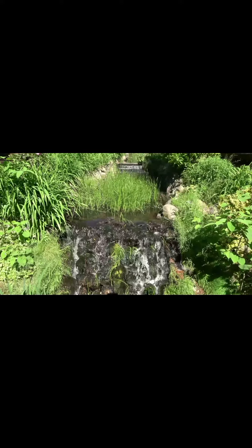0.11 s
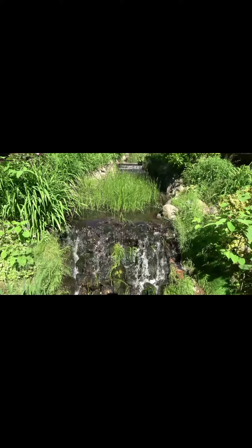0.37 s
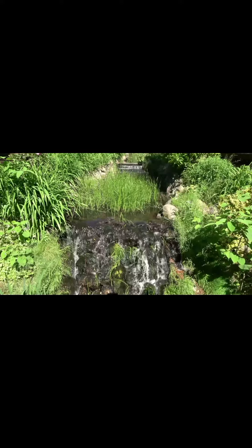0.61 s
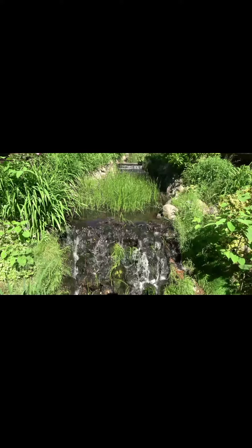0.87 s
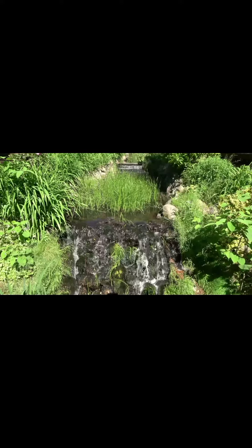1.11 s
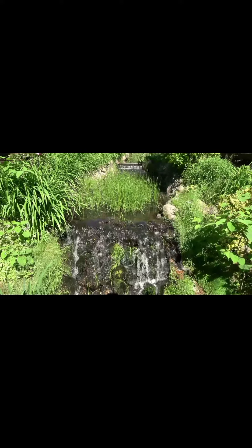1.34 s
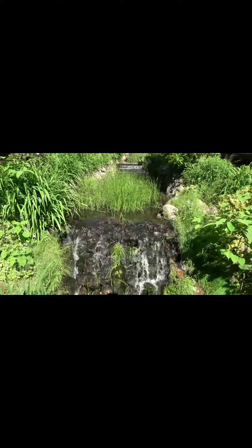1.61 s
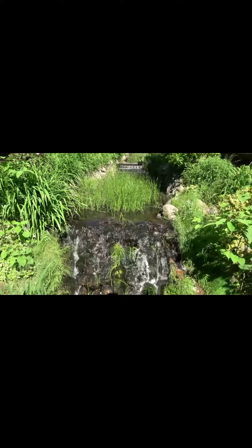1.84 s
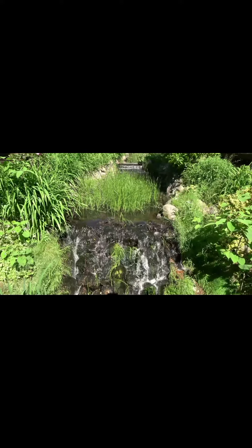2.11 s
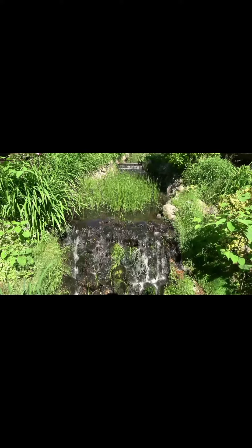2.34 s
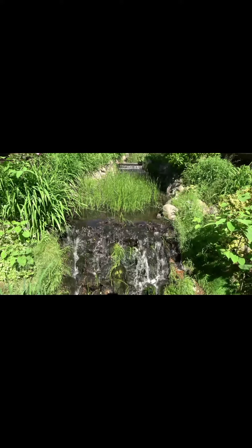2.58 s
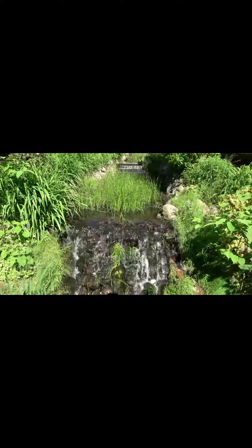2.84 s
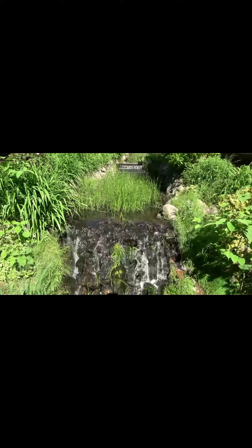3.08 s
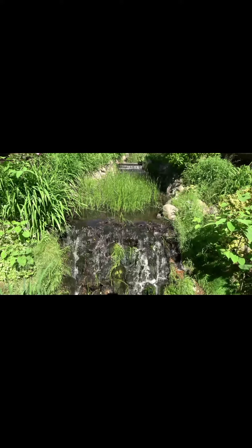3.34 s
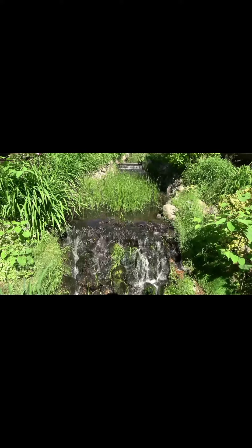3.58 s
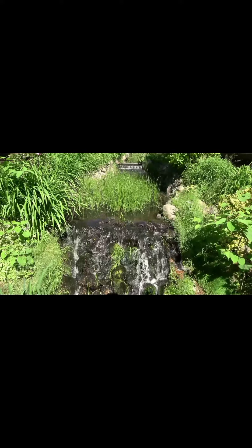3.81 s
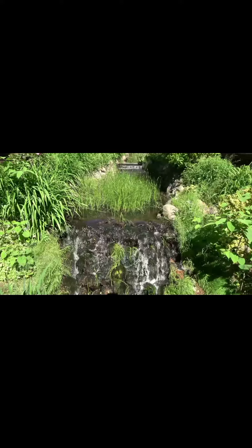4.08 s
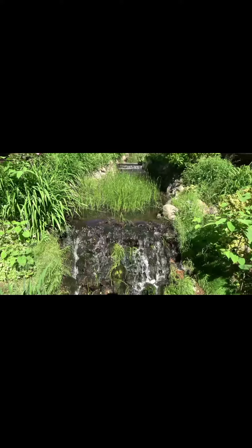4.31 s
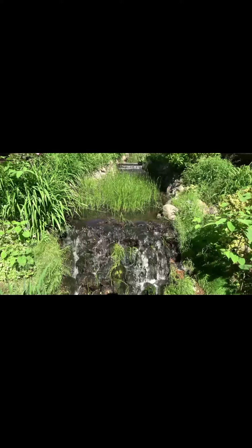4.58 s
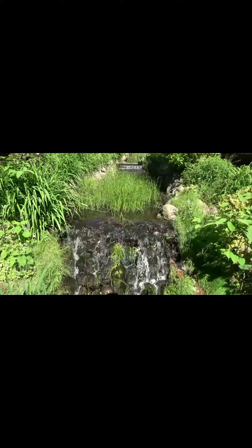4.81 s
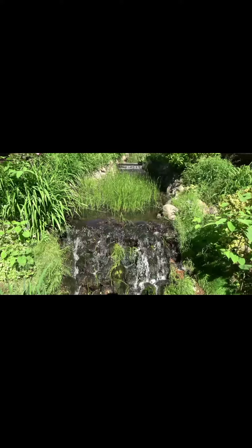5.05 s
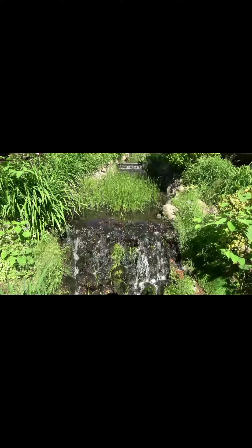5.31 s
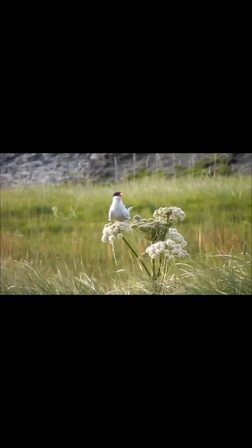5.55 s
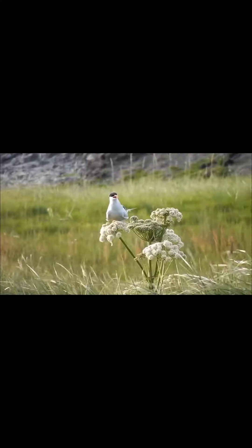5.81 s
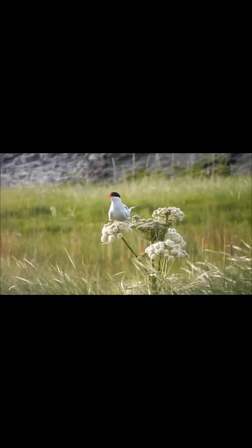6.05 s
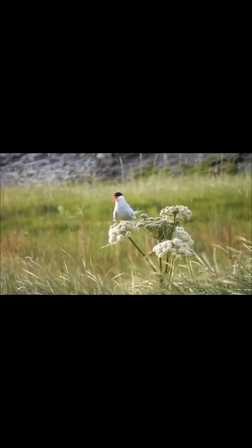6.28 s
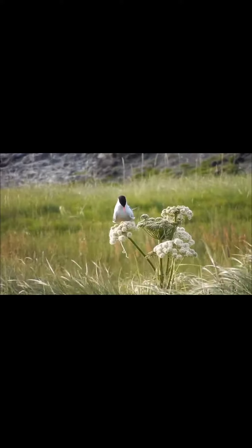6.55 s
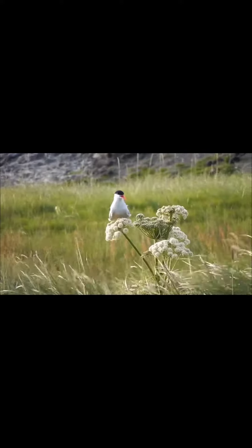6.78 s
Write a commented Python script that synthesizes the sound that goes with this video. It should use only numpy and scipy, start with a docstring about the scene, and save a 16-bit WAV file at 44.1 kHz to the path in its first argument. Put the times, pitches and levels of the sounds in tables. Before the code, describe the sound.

From 0 to 4.85 seconds a small waterfall splashes without pause, a broad watery hiss with bubbling gurgles, fine spray and faint low rumble. A clear whistle near 2 kHz sounds on the left at the start; from 0.9 to 2.1 a distant bird repeats short even pips, with a fuller answering note on the right around 1.7 and scattered blurred chips. Birdsong thins until about 3.5, then thickens: another piped note, soft dove-like coos, and a near bird's bright whistles from 3.7, bending downward, ending in two steep falls near 4.6 and 4.8, echoing in the hollow. Everything stops abruptly. After about 0.7 seconds of silence, at 5.57 a much quieter shore cuts in: soft low distant surf, with terns giving buzzing, rapidly chopped churrs, some closing on a clean falling note, around 5.6, 5.8, 6.25 and 6.8, between quick high yelps and hoarse grunts until 7.

```python
"""Waterfall hollow, then tern shore

A small waterfall of shaped noise and ringing droplets splashes over rocks in a leafy hollow, while
songbirds built from gliding sines and smeared tones whistle, sweep and chip around it.
The sound cuts to silence, then to a shore meadow: terns of stacked partials and chopped rasp churr
and yelp over a low noise wash of far surf, their lower partials coming back late on the right."""
import sys
import numpy as np
from scipy import signal
from scipy.fft import rfft, irfft, next_fast_len
from scipy.io import wavfile
from scipy.ndimage import uniform_filter1d

SR = 44100
rng = np.random.default_rng(int(sys.argv[2]) if len(sys.argv) > 2 else 0)


def invert_db(x):
    """Field ratio 10**(x/20) for x, a level in decibels (scalar or array-like)."""
    u = np.asarray(x, float) / 20
    return 10 ** u


def generate_wav(sig):
    """Save sig (samples, or channels by samples) to the path in sys.argv[1] as 16-bit PCM at SR."""
    pcm = np.round(np.clip(np.atleast_2d(sig).T, -1, 1) * 32767).astype(np.int16)
    wavfile.write(sys.argv[1], SR, pcm)


N = 304731  # length in samples


def evened(x):
    """Scales a sound to an rms of 1."""
    return x / np.sqrt(np.mean(x ** 2) + 1e-20)


def read(points, hz, axis=1):
    """Reads one column of a table over log frequency."""
    columns = np.transpose(points)
    return np.interp(np.log(hz + 1), np.log(columns[0] + 1), columns[axis])


def add(mix, s, sound):
    """Lays a sound into the mix, in place, at time s."""
    part = mix[..., round(s * SR):][..., :sound.shape[-1]]
    part += sound[..., :part.shape[-1]]


def unroll(rows):
    """Turns breakpoints into a start time and one envelope per column, sample by sample."""
    s, *columns = np.transpose(rows)
    t = np.arange(s[0], s[-1], 1 / SR)
    return s[0], [np.interp(t, s, column) for column in columns]


def coloured(x, gain_db):
    """Filters by a gain given as a function of frequency."""
    size = next_fast_len(x.shape[-1])
    gain = invert_db(gain_db(np.fft.rfftfreq(size, 1 / SR)))
    return irfft(rfft(x, size) * gain, size)[..., :x.shape[-1]]


def sided(x, pan_db):
    """Places a sound between left and right by a level difference; positive is left."""
    return x * invert_db(np.array([pan_db / 2, -pan_db / 2]).reshape(2, -1))


# Tone colour of the falling water: f/Hz, relative level/dB per Hz
FALL = [(15, -40.5), (25, -9.5), (64, -1), (247, -10), (351, -9), (424, -7.5), (472, -8), (586, -14),
        (670, -10.5), (1720, -6), (3200, -11.5), (5200, -9), (6280, -12.5), (9410, -13), (15700, -21.5)]
# Stereo width of the fall: f/Hz, left-right likeness (-1 to 1)
FALL_SAME = [(30, -.3), (60, .1), (150, .3), (380, .8), (950, .92), (2380, .83), (5000, .5), (7000, .62),
             (8500, .72), (10500, .66), (12500, .4), (15000, .3)]
# Slow swell of the whole fall except its rumble: t/s, level/dB
FALL_SWELL = [(0, 2), (1, 1), (2, 1.5), (3, 1), (4, 2), (4.85, 2.5)]


def waterfall():
    """Dense falling water is a noise wash, with bubbling gurgles and fine spray standing a little out."""
    balance = [(60, 1.5), (500, 1.2), (15000, .1)]  # f/Hz, left-right level/dB
    body = wash(FALL, FALL_SAME, balance, patchy_db=1.77, flicker_db=2.0)
    gurgle = droplets(500, low_hz=509.7, high_hz=2800, cycles=3.8, spread_db=1.5)
    spray = droplets(980, low_hz=3500, high_hz=12000, cycles=2.5, spread_db=5.5)
    swell = invert_db(np.interp(np.arange(N) / SR, *np.transpose(FALL_SWELL)))
    water = invert_db(0.28) * body + invert_db(-13) * gurgle + invert_db(-21) * spray
    return invert_db(-43.5) * swell * water + drone(hz=57.3, width_hz=28.6, level_db=-54.5)


def wash(spectrum, same, balance, patchy_db, flicker_db):
    """Many small splashes merge into noise: random spectra with drifting patches and a treble flicker."""
    frames, hz = N // 128 + 5, np.fft.rfftfreq(512, 1 / SR)
    a, b, c, d, patches = rng.standard_normal((frames, 257, 5)).T
    patches = evened(uniform_filter1d(uniform_filter1d(patches, 5, 0), 16, 1))
    # smoothed over 120 bins, so wide bands flicker together
    flicker = evened(uniform_filter1d(rng.standard_normal((frames, 257)).T, 120, 0))
    treble = np.clip(hz / 1500, 0, 1)[:, None]
    like = np.clip(read(same, hz), -1, 1)[:, None]
    left = a + 1j * b
    right = like * left + np.sqrt(1 - like ** 2) * (c + 1j * d)
    z = np.array([left, right]) * invert_db(patchy_db * patches + flicker_db * treble * flicker)
    noise = signal.istft(z, nperseg=512, noverlap=384)[1][:, :N]
    sides = [coloured(noise[k], lambda f: read(spectrum, f) + (.5 - k) * read(balance, f))
             for k in range(2)]
    return evened(np.array(sides))


def droplets(per_s, low_hz, high_hz, cycles, spread_db, count=24):
    """Bubbles ring as short rising tones at chance moments, a few of them large."""
    size = invert_db(spread_db * np.minimum(rng.exponential(1, N), 5))
    hits = size * (rng.random(N) < per_s / SR)
    kind, out = rng.integers(0, count, N), np.zeros((2, N))
    for k, hz in enumerate(np.geomspace(low_hz, high_hz, count)):
        turns = np.arange(0, 3 * cycles, hz / SR)
        tone = np.sin(2 * np.pi * turns * (1 + .03 * turns / cycles))
        ring = tone * np.exp(-1.5 * turns / cycles) * np.minimum(turns, 1)
        pan = invert_db(rng.uniform(0.5, 2.0) * np.array([[1], [-1]]))
        out += signal.oaconvolve(hits * (kind == k), ring)[:N] * pan
    return evened(out)


def drone(hz, width_hz, level_db):
    """Heavy water rumbles low in one narrow noise band, unlike at the two microphones."""
    sides = [chip(0, N / SR, hz, hz, width_hz, level_db, 0, edge=0)[1][0] for _ in range(2)]
    return np.array(sides)


# Reverb time of the hollow: f/Hz, t60/s
HOLLOW = [(500, 0.45), (2000, 1), (4500, 1), (7000, 0.57)]


def songbirds():
    """Near and far singers, all thrown back by the hollow; the loud sweeps stir it most."""
    pipers, sweeper, far = piping_birds(), sweeping_bird(), blurred_birds()
    sent = invert_db(-12) * pipers + invert_db(-3) * sweeper + invert_db(-10) * far
    return pipers + invert_db(-1.5) * sweeper + far + echoes(sent, HOLLOW, start_s=.008, shared=.35)


# Near singer's syllables, held then bent down: t/s, length/s, start f/Hz, end f/Hz, level/dB before trim
HOOKS = [(3.671, 0.072, 5560, 5110, -34.5), (3.907, 0.096, 7260, 5650, -29.5),
         (4.209, .097, 7380, 5800, -28.5), (4.389, 0.088, 7180, 5510, -31.5)]
# Its nearly straight falls, same columns
SLIDES = [(4.628, .072, 5660, 3285, -27.5), (4.78, .068, 5817, 3440, -26.5)]
# Its short dying pips, same columns
PIPS = [(3.806, 0.034, 4570, 4400, -33), (4.045, .045, 5310, 5140, -36), (4.125, 0.047, 4620, 4265, -28.5),
        (4.52, 0.061, 4000, 4043, -33)]
# Syllable shapes: bend exponent, start level/dB, peak place (0-1), end level/dB, left-right level/dB
HOOK_SHAPE = (3.2, -10, .78, -3, -9)
SLIDE_SHAPE = (.92, -10, .35, -7, -5)
PIP_SHAPE = (1.4, -7, .3, -9, -1.5)


def sweeping_bird():
    """The near singer glides a pure whistle through hooks, falling slides and pips."""
    mix = np.zeros((2, N))
    for table, shape in ((HOOKS, HOOK_SHAPE), (SLIDES, SLIDE_SHAPE), (PIPS, PIP_SHAPE)):
        for row in table:
            add(mix, *whistle(syllable(*row, *shape), flutter=.3))
    return mix


# Held notes of the piper on the left: t/s, length/s, onset f/Hz, swell/dB, level/dB
PIPES = [(0.06, 0.26, 2140, 6, -36.5), (3.754, 0.25, 2346, -2.5, -41)]
# Its short rising note: t/s, length/s, start f/Hz, end f/Hz, level/dB before shape
PIPE_LEAD = [(3.476, 0.081, 1990, 2175, -48.5)]
# A far piper repeating a note near one pitch: t/s, length/s, f/Hz, level/dB
FAR_PIPES = [(.935, 0.08, 2875, -47), (1.04, .125, 2885, -51), (1.195, 0.089, 2850, -47.5),
             (1.3, 0.028, 2830, -46), (1.35, 0.077, 2815, -55), (1.455, 0.061, 2820, -50.5),
             (1.545, 0.059, 2845, -49), (1.63, 0.027, 2845, -55), (1.67, .045, 2840, -50),
             (1.73, 0.087, 2850, -49.5), (1.86, 0.06, 2870, -47.5), (1.94, .065, 2840, -53),
             (2.03, 0.055, 2850, -52)]
# A far dove: t/s, length/s, start f/Hz, end f/Hz, level/dB before shape
COOS = [(3.74, .1, 473.4, 481, -58.5), (3.91, 0.12, 483, 472.5, -58.5), (4.1, .2, 489.7, 484, -54),
        (4.35, .16, 469, 503, -57.5), (4.53, 0.19, 510, 494, -61)]
# Shapes: bend exponent, start level/dB, peak place (share of note), end level/dB.
# The soft peak lies past the end, so the level only sinks from +5 to +3 dB
SOFT_SHAPE = (1.2, 5, 2.5, -9.5)
FAR_SHAPE = (1.2, -5, 1, -1.5)
# A quick arched chirp on the left: t/s, length/s, top f/Hz, level/dB
CHIRP = [(.508, .075, 3510, -47)]
# A flat-topped answer on the right, same columns
ANSWER_NOTE = [(1.662, .185, 2390, -38)]
# Arches: top place (0-1), start and end pitch (shares of top), start and end level/dB, squareness
CHIRP_ARCH = (.3, .87, .83, -7, -15, 2.0)
ANSWER_ARCH = (.5, .96, .965, -9, -13, 3.)


def piping_birds():
    """Pipers, a dove and two arched callers sing near sines."""
    notes = [held(*row) for row in PIPES]
    notes += [syllable(*row, *SOFT_SHAPE, pan_db=8.5) for row in PIPE_LEAD]
    notes += [syllable(s, length, hz, hz, level_db, *FAR_SHAPE, pan_db=8.5)
              for s, length, hz, level_db in FAR_PIPES]
    notes += [syllable(*row, *SOFT_SHAPE, pan_db=0) for row in COOS]
    for table, shape, pan_db in ((CHIRP, CHIRP_ARCH, 14), (ANSWER_NOTE, ANSWER_ARCH, -7)):
        notes += [np.insert(arch(*row, *shape), 3, pan_db, axis=1) for row in table]
    mix = np.zeros((2, N))
    for rows in notes:
        add(mix, *whistle(rows, flutter=.36))
    return mix


# Blurred chips of distant birds: t/s, length/s, f/Hz, level/dB, left-right level/dB
CHIPS = [(0, 0.097, 3920, -50.5, -4.5), (0, 0.25, 1737, -54.5, 0.5), (.6, 0.113, 2800, -54.5, 11),
         (1.234, 0.094, 1375, -51.5, 1), (1.412, .24, 1940, -44.5, -5), (1.406, .14, 1750, -51, -5),
         (1.655, .041, 3370, -59, -17), (2.259, .16, 3910, -56.5, -12), (2.361, .26, 1810, -50.5, 5),
         (0.868, .25, 3955, -54, 5.5), (3.546, .1, 2440, -48.5, 6.5), (3.554, .18, 2135, -52.5, 9),
         (3.55, 0.062, 4580, -49.5, -5), (3.61, 0.146, 1850, -51.5, 6.5), (3.97, 0.027, 2470, -46.5, -9),
         (3.98, 0.0585, 2900, -46.5, 9), (4.064, 0.12, 2650, -44, 6), (4.152, 0.11, 2330, -47.5, 5.5),
         (4.55, 0.15, 6180, -44, -5.5), (2.08, 0.058, 2390, -49, 2), (2.203, .05, 2670, -49, -2)]
# Small glides from the trees: t/s, length/s, start f/Hz, end f/Hz, level/dB
GLIDES = [(2.176, 0.15, 3590, 3780, -51), (2.895, 0.064, 3910, 3570, -48),
          (2.896, 0.051, 2800, 2620, -50.5), (3.942, .04, 4420, 4780, -41.5),
          (3.999, 0.044, 2610, 2443, -41), (4.051, 0.063, 3890, 3700, -42),
          (4.164, 0.029, 4580, 4820, -38.5), (4.262, .13, 2406, 2250, -51),
          (4.415, 0.041, 2170, 2063, -47.5), (4.479, 0.053, 6790, 7200, -42)]


def blurred_birds():
    """Chips and glides smeared into noise bands, plus a soft blur behind the later hooks."""
    mix = np.zeros((2, N))
    for s, *_, level_db in HOOKS[1:]:
        add(mix, *chip(s + .02, .17, 5000, 4510, 1800, level_db - 12.5, pan_db=8, edge=0.35))
    for s, length, hz, level_db, pan_db in CHIPS:
        add(mix, *chip(s, length, hz, hz, .062 * hz, level_db, pan_db))
    for s, length, start_hz, end_hz, level_db in GLIDES:
        add(mix, *chip(s, length, start_hz, end_hz, .06 * start_hz, level_db, pan_db=1.5))
    return mix


def held(s, length, onset_hz, swell_db, level_db):
    """The pitch settles from its onset; the note swells, stops and rings on."""
    settled_hz, settle_s, rise_s, ring_s = 2028, 0.022, 0.03, .27
    t = np.linspace(0, length + ring_s, num=80)
    shape_db = np.interp(t, [0, rise_s, length, length + rise_s, length + ring_s],
                         [-11.5 - swell_db, -swell_db, 0, -6.5, -17.5])
    hz = settled_hz + (onset_hz - settled_hz) * np.exp(-t / settle_s)
    return np.c_[s + t, hz, level_db + shape_db, 8.5 + 0 * t]  # piper's left-right dB


def syllable(s, length, start_hz, end_hz, level_db, bend, start_db, peak, end_db, pan_db):
    """A glide along a power curve while its level heads for a single peak."""
    u = np.linspace(0, 1, num=24)
    hz = start_hz + (end_hz - start_hz) * u ** bend
    shape_db = np.interp(u, [0, peak, 1], [start_db, 0, end_db])
    return np.c_[s + length * u, hz, level_db + shape_db, pan_db + 0 * u]


def arch(s, length, top_hz, level_db, top, start, end, start_db, end_db, squareness):
    """Pitch and effort climb to a top and fall back along a rounded arch."""
    u = np.linspace(0, 1, num=24)
    up = np.clip(1 - u / top, 0, 1) ** squareness
    down = np.clip((u - top) / (1 - top), 0, 1) ** squareness
    hz = top_hz * (1 - (1 - start) * up - (1 - end) * down)
    return np.c_[s + length * u, hz, level_db + start_db * up + end_db * down]


def whistle(rows, flutter):
    """A near sine whose level and pitch waver at random."""
    s, (hz, level_db, pan_db) = unroll(rows)
    drift = uniform_filter1d(uniform_filter1d(rng.standard_normal(len(hz)), 150), 150)
    wobble = 1 + flutter * evened(drift)
    hz = hz * (1 + .012 * (wobble[::-1] - 1))  # the same drift, reversed, bends the pitch slightly
    tone = np.sqrt(2) * np.sin(2 * np.pi * np.cumsum(hz) / SR) * invert_db(level_db) * wobble
    return s, sided(tone * signal.windows.tukey(len(hz), 400 / len(hz)), pan_db)


def chip(s, length, start_hz, end_hz, width_hz, level_db, pan_db, edge=0.17):
    """A gliding tone smeared into a narrow band by lowpassed complex noise."""
    hz = np.linspace(start_hz, end_hz, round(length * SR))
    smear = rng.standard_normal((max(16000, len(hz) + 1000), 2)) @ [1, 1j]
    lowpass = signal.butter(2, width_hz / 2, fs=SR, output="sos")
    smear = signal.sosfilt(lowpass, smear)[1000:1000 + len(hz)]  # skips the filter's start-up
    tone = evened((smear * np.exp(2j * np.pi * np.cumsum(hz) / SR)).real)
    return s, sided(invert_db(level_db) * tone * signal.windows.tukey(len(hz), edge), np.array(pan_db))


def echoes(x, decays, start_s, shared):
    """Sparse taps of random sign scatter the sound, each band dying at its own speed."""
    first, taps = round(start_s * SR), np.zeros((2, SR))
    at = np.arange(first, SR - 20, 20)
    at = at + rng.integers(0, 20, (SR // 20, 2)).T[:, :len(at)]
    signs = rng.choice([-1., 1.], (SR // 20, 2)).T[:, :at.shape[1]]
    np.put_along_axis(taps, at, signs, 1)
    hz, t, z = signal.stft(taps, SR, nperseg=256)
    z = z * invert_db(-60 * t / read(decays, hz)[:, None])
    z = z + shared * z[::-1]  # both microphones hear part of the same echoes
    tail = signal.istft(z / np.linalg.norm(z, axis=2, keepdims=True), SR, nperseg=256)[1]
    return signal.fftconvolve(x, tail / np.linalg.norm(tail[0]), axes=1)[:, :N]


# Clean yelps: t/s, length/s, top f/Hz, level/dB before the paths, top place (0-1)
YELPS = [(5.748, 0.047, 3300, -60.5, 0.6), (5.894, 0.07, 3360, -58, .55), (6.073, 0.064, 3370, -56, .6),
         (6.239, 0.072, 3464, -52.5, 0.7), (6.331, .038, 3030, -56.5, 0.47),
         (6.413, 0.068, 3450, -53.5, 0.55), (6.579, .076, 3350, -56.5, .55),
         (6.756, 0.074, 3365, -56.5, 0.42), (6.802, 0.055, 2910, -58.5, 0.3)]
# Their arch: start and end pitch (shares of top), start and end level/dB, squareness
YELP_ARCH = (.885, .91, -10, -10, 2.5)
# Churrs: t/s, length up to the closing note/s, pace of the close/s,
# level/dB and closing note level/dB, both before the paths
CHURRS = [(5.401, 0.1707, 0.025, -40.5, -31), (5.818, .19, 0.023, -41, -34),
          (6.248, 0.187, 0.024, -45, -36.5), (6.78, 0.35, .02, -47.5, -38)]
# Short hoarse grunts: t/s, length/s, f/Hz, level/dB before the paths, rasp share (0-1) before its limit
GRUNTS = [(5.733, 0.038, 2650, -41.5, .9), (6.171, 0.024, 2290, -46, .4), (6.595, 0.038, 2400, -52, .9),
          (6.685, 0.03, 2520, -55, .95)]
# Straight path to each microphone, late path to the right: f/Hz, left, right and late level/dB
PATHS = [(1490, -30, -33, -8), (2330, -56, -18, 7), (3290, -27, -6, 5.5), (3970, 10.5, -15, 12.5),
         (5800, -3.5, 1.5, -22), (8800, -18, 3.5, -41), (13000, -13, 6.5, -44.5)]


def terns():
    """Upper partials come straight; the lower ones return late on the right."""
    voice = np.zeros(N)
    for row in YELPS:
        add(voice, *yelp(arch(*row, *YELP_ARCH)))
    for rows in [churr_shape(*row) for row in CHURRS] + [grunt_shape(*row) for row in GRUNTS]:
        add(voice, *churr(rows))
    left, right, late = (coloured(voice, lambda f: read(PATHS, f, axis=k)) for k in (1, 2, 3))
    add(right, .021, late)  # delay in s
    mix = np.array([left, right])
    # a short peep from another bird
    add(mix, *chip(6.883, .025, 1800, 1760, width_hz=90, level_db=-59, pan_db=-8))
    decays = [(2500, .12), (8000, .12)]  # f/Hz, t60/s
    return mix + invert_db(-17) * echoes(mix, decays, start_s=.004, shared=.2)


def stack(hz, partials_db):
    """A tone with its whole-number overtones."""
    turns = np.cumsum(hz) / SR
    return sum(invert_db(level_db) * np.sqrt(2) * np.sin(2 * np.pi * (k + 1) * turns)
               for k, level_db in enumerate(partials_db))


# Yelp partials from the fundamental up: level/dB, the third and fourth before the loudness tilt
YELP_PARTIALS_DB = (9, 6.5, -4, -13)


def yelp(rows):
    """A clean arched call; the louder it is, the stronger its third and fourth partials."""
    s, (hz, level_db) = unroll(rows)
    hoarse = evened(uniform_filter1d(rng.standard_normal(len(hz)), 90))
    hz = hz * (1 + .006 * hoarse)
    richer_db = .5 * (level_db.max() + 59)
    partials_db = [db + max(k - 1, 0) * richer_db for k, db in enumerate(YELP_PARTIALS_DB)]
    return s, stack(hz, partials_db) * invert_db(level_db) * signal.windows.tukey(len(hz), .25)


# Churr partials from the fundamental up: level/dB at no throb depth
CHURR_PARTIALS_DB = (-4, -10, -13, -32)
# Tone colour of the rasp: f/Hz, relative level/dB per Hz
RASP = [(1800, -22), (2400, -2.5), (3000, 4), (3600, -6), (4500, -10.5), (5300, -0.5), (6800, -17.5),
        (8700, -9.5), (10500, -15), (12500, -36), (16000, -50)]


def churr(rows):
    """A tone and a rasp of noise, chopped about a hundred times a second as deeply as the rows ask."""
    s, (hz, level_db, depth, rasp) = unroll(rows)
    drift = evened(uniform_filter1d(rng.standard_normal((SR // 2, 2)).T, 500, 1))[:, :len(hz)]
    beats = np.cumsum(107.3 * (1 + .03 * drift[0])) / SR  # mean throb rate in Hz
    strength = invert_db(0.62 * rng.standard_normal(60)[beats.astype(int)])  # uneven from throb to throb
    beat = np.sin(np.pi * beats) ** 2 * strength
    # each throb slides a little in pitch
    hz = hz * (1 - .02 * depth * np.sin(2 * np.pi * beats))
    chopped = np.clip(depth, 0, 1)
    throb = 1 + chopped * (2.4 * beat ** 1.8 - 1)
    hiss = evened(coloured(rng.standard_normal(SR // 2), lambda f: read(RASP, f)))[:len(hz)]
    # a fully chopped voice stays mostly tone
    rasp = np.clip(rasp, 0, 1 - .62 * chopped)
    # overtones open as the chopping lets go
    partials_db = [db - 4.3 * k * depth for k, db in enumerate(CHURR_PARTIALS_DB)]
    tone = stack(hz * (1 + 0.0235 * depth * drift[1]), partials_db)
    voice = np.sqrt(1 - rasp) * tone * throb
    # some air leaks between throbs
    voice += np.sqrt(rasp) * hiss * (.3 + .7 * throb)
    return s, voice * invert_db(level_db) * signal.windows.tukey(len(hz), 300 / len(hz))


def churr_shape(s, length, pace, level_db, close_db):
    """A chopped rasp swells and sags a little, then jumps up to a clean falling note."""
    hz, depth, rasp = 2634, .88, .38
    end = s + length
    # t/s, f/Hz, level/dB, throb depth, rasp share
    return [(s, .97 * hz, level_db - 12, depth, rasp),
            (s + 0.0345, hz, level_db, depth, rasp),
            (end, hz, level_db - 3.0, depth, rasp),
            (end + 0.76 * pace, 2998, close_db - 8, .75, 0),
            (end + 2.15 * pace, 2870, close_db, 0, 0),
            (end + 2.76 * pace, 2620, close_db - 22, 0, 0)]


def grunt_shape(s, length, hz, level_db, rasp):
    """One quick hoarse swell, only lightly chopped."""
    return [(s + u * length, hz, level_db + shape_db, .2, rasp)
            for u, shape_db in ((0, -7), (.43, 0), (1, -10.5))]


# Tone colour of the far surf: f/Hz, relative level/dB per Hz
SURF = [(24, -49), (40, -10), (106, -22.5), (377, -0.5), (535, 0), (859, -8.5), (1250, -18), (2710, -26),
        (3300, -23), (4570, -19.5), (6160, -25), (6810, -20.5), (8110, -30), (9650, -21.5), (15500, -35)]
# Its stereo width: f/Hz, left-right likeness (0 to 1)
SURF_SAME = [(60, 1), (180, 1), (550, 0.68), (1650, .1), (5000, 0.24), (15000, 0.44)]
# Its lean: f/Hz, left-right level/dB
SURF_BALANCE = [(60, 0.0), (180, -1.5), (550, 2), (1650, -4), (4970, -2.0), (15000, -5)]


def surf():
    """Far surf is a low patchy noise wash with a rumble beneath."""
    body = wash(SURF, SURF_SAME, SURF_BALANCE, patchy_db=3.0, flicker_db=1.0)
    return invert_db(-48.5) * body + drone(hz=80, width_hz=54, level_db=-69.5)


def scene():
    """The hollow, a silence, then the shore."""
    t = np.arange(N) / SR
    cut_out_s, cut_in_s = 4.849, 5.565
    # hard edits with a millisecond of fade
    before = np.clip((cut_out_s - t) * 1000, 0, 1)
    after = np.clip((t - cut_in_s) * 1000, 0, 1)
    return before * (waterfall() + songbirds()) + after * (surf() + terns())


def low_pass(x):
    """Removes everything above the highest recorded frequency."""
    return signal.sosfilt(signal.butter(12, 16800, fs=SR, output="sos"), x)


def record(dry):
    """A steep lowpass takes off the very top of the finished mix."""
    lowpass = signal.firwin(511, 15780, window=("kaiser", 9), fs=SR)
    mix = signal.oaconvolve(dry, lowpass[None], "same")
    return low_pass(mix)


dry = scene()
out = record(dry)
generate_wav(out)
```